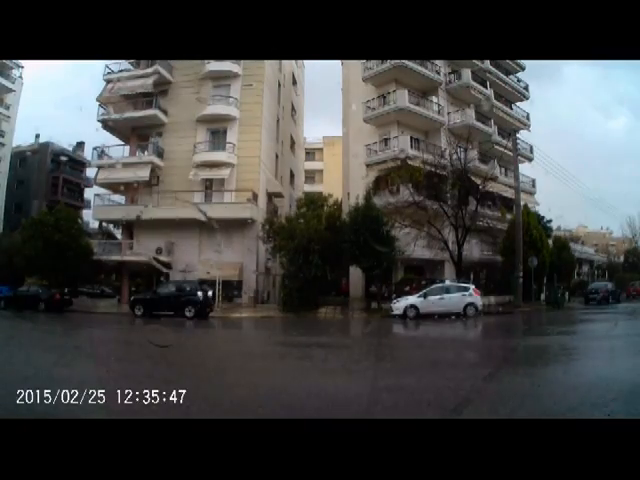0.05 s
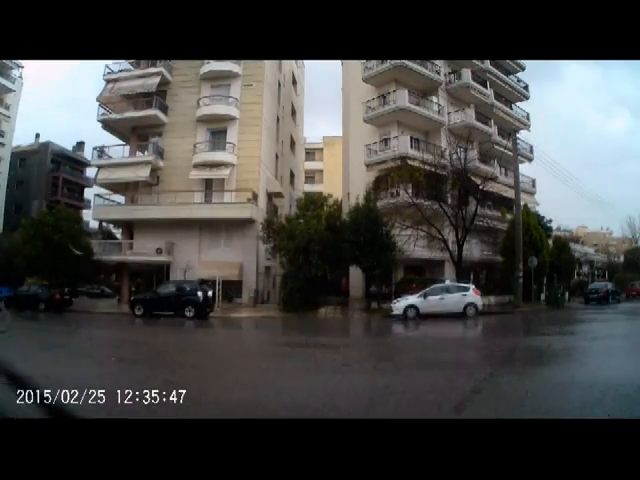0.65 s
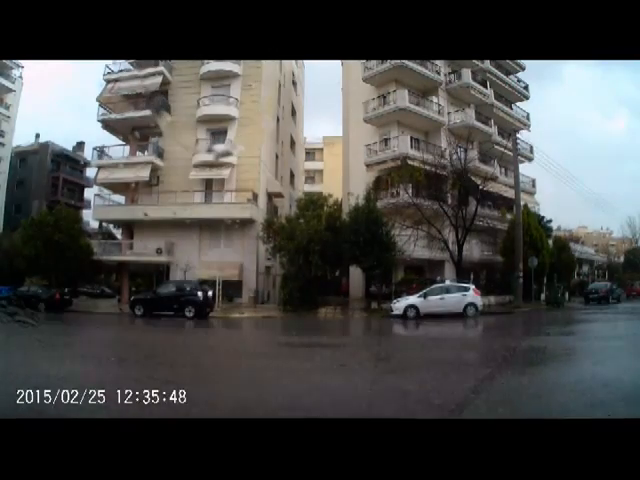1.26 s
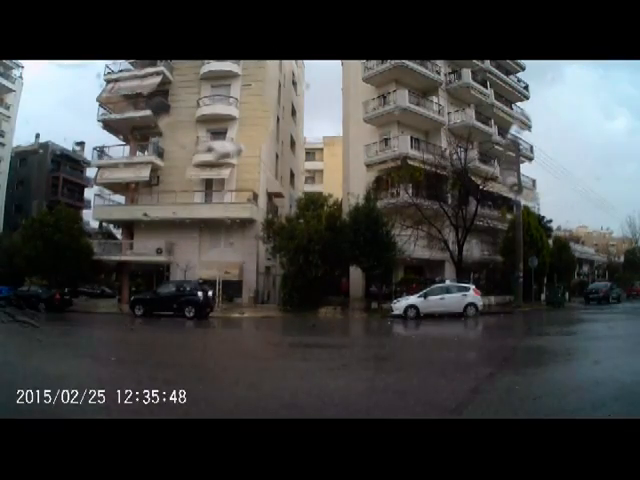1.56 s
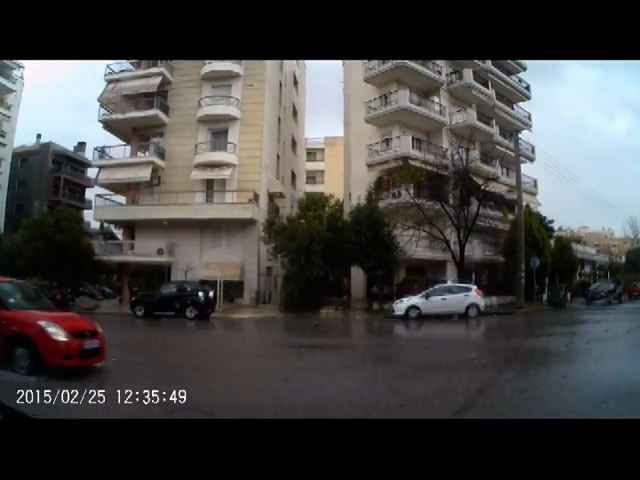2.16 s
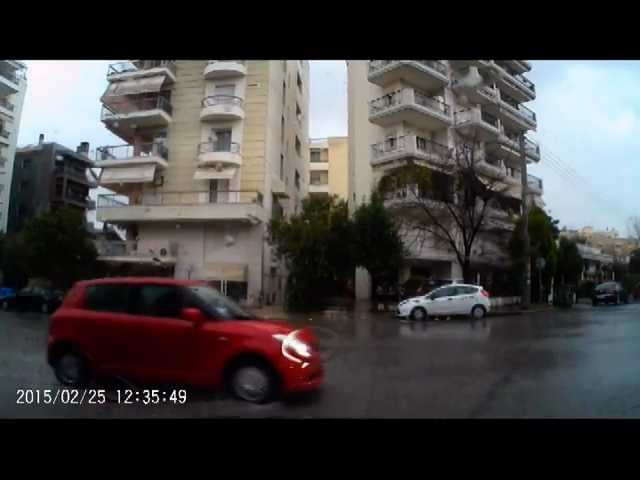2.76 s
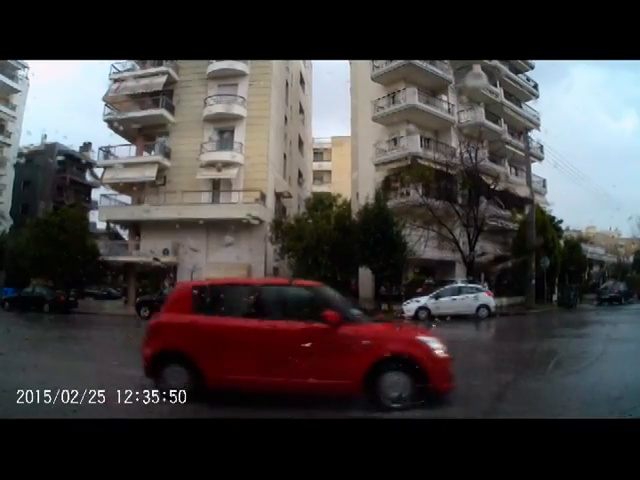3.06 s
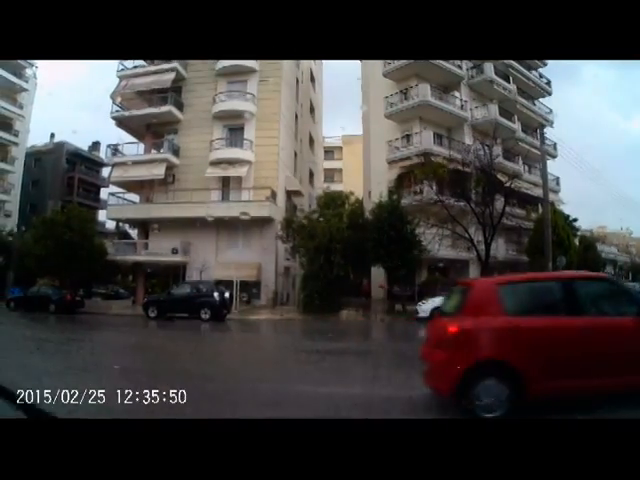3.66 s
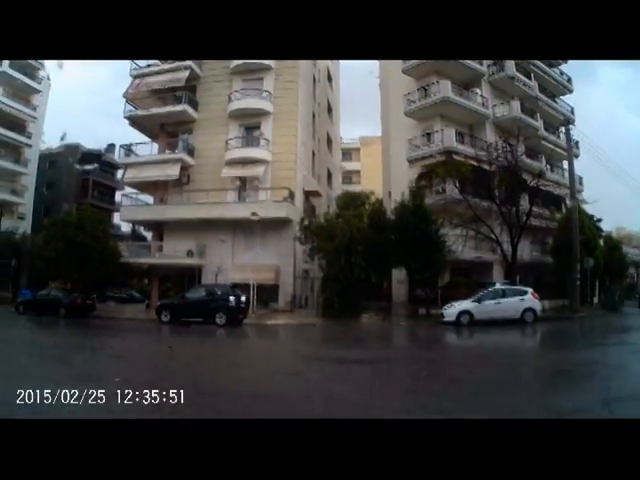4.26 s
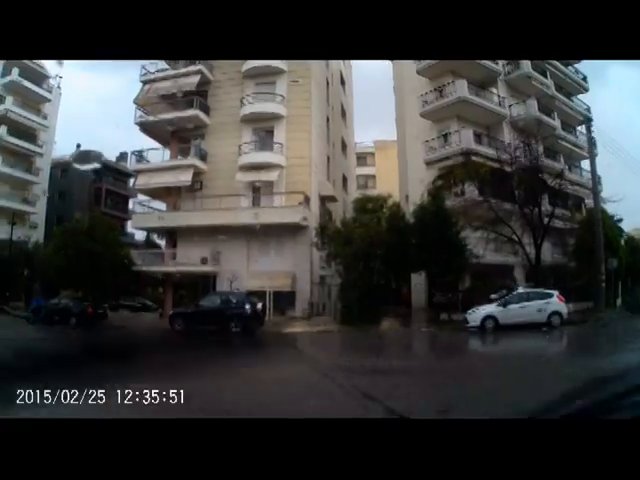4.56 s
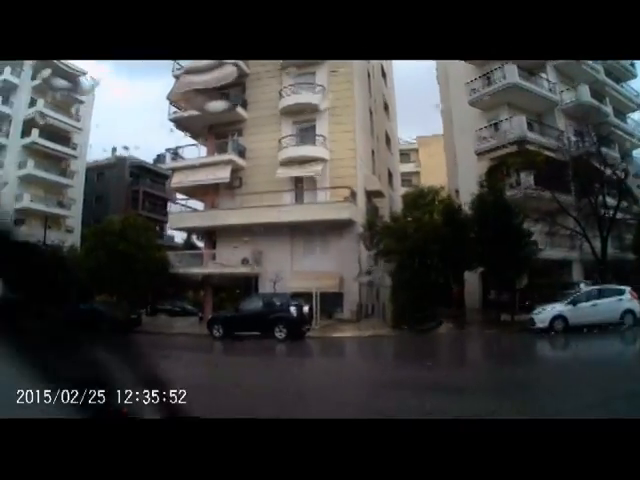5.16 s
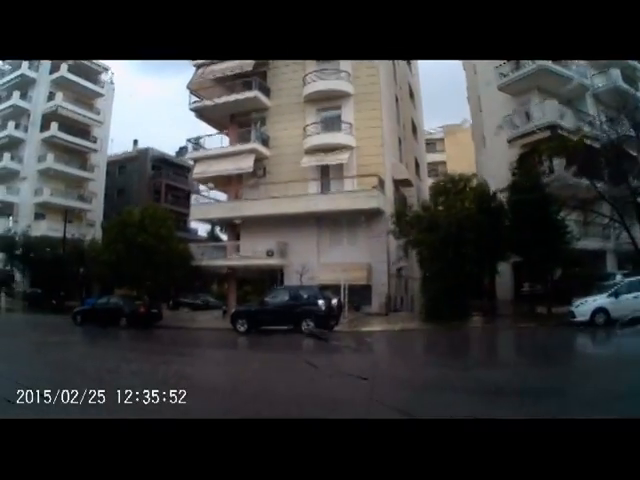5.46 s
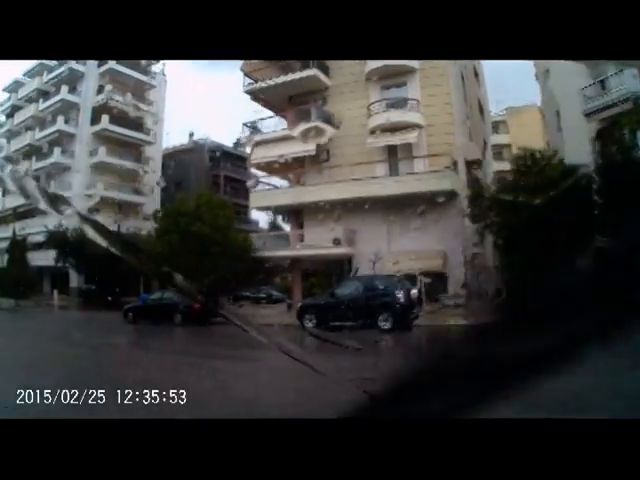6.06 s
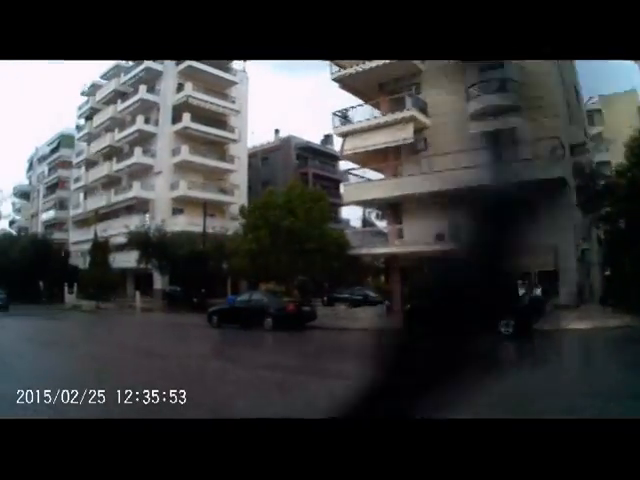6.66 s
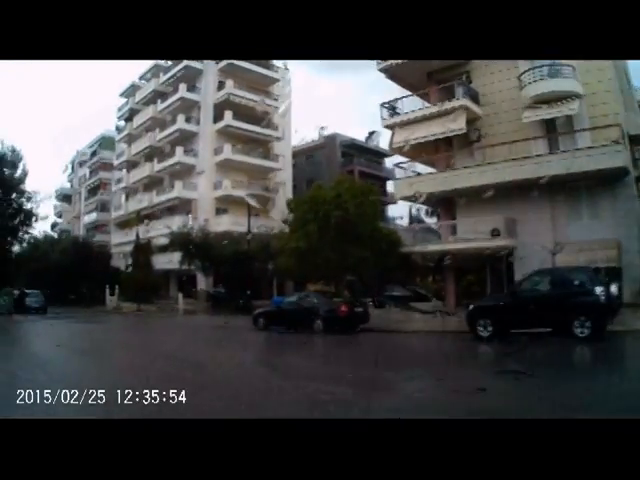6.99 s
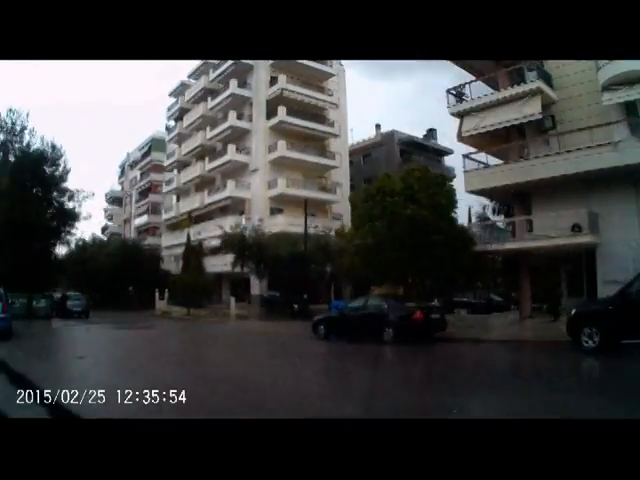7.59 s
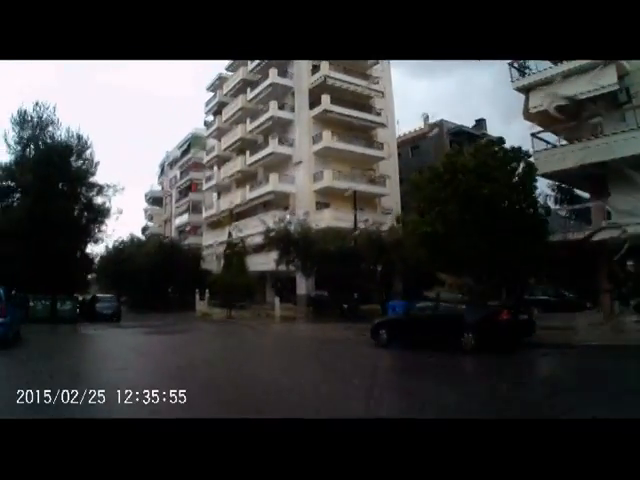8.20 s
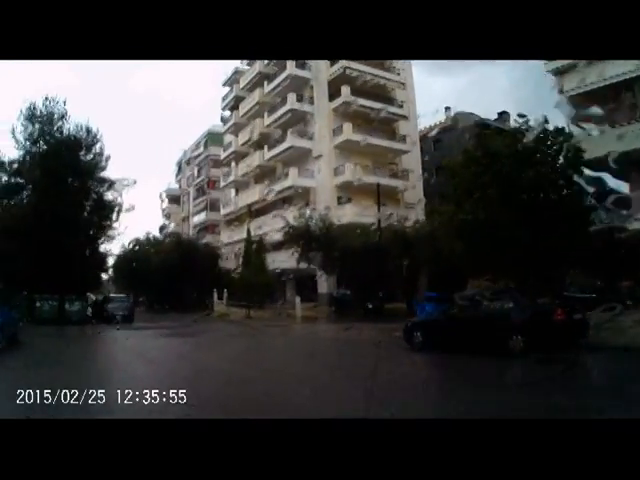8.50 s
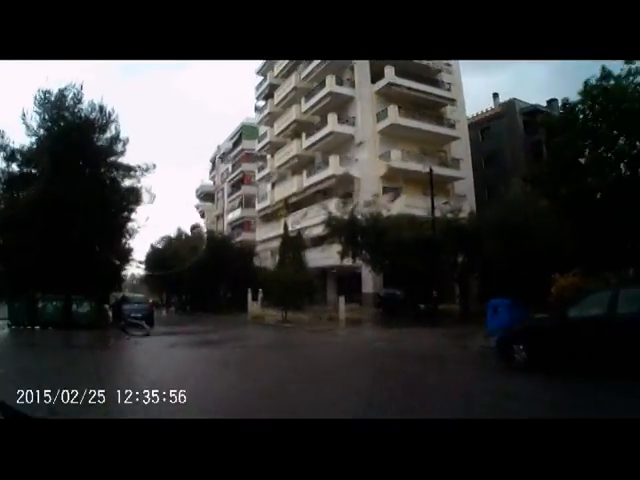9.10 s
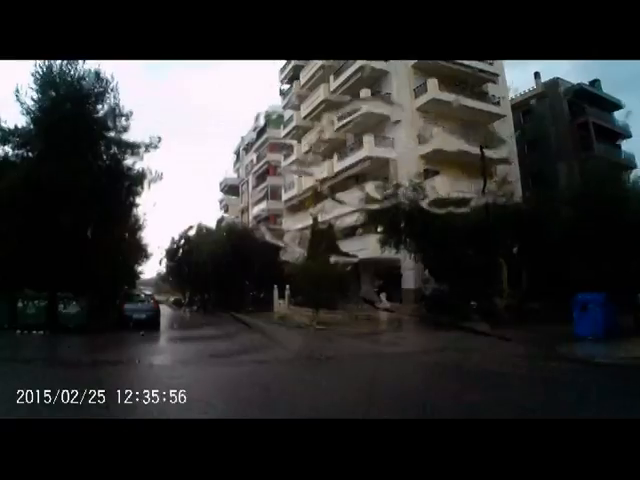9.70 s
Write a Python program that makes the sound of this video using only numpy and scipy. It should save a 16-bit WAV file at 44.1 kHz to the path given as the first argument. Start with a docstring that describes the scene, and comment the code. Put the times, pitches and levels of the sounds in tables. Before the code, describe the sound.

Inside a car, raindrops tap and patter over sweeping wipers and a low engine and tyre rumble that builds as it drives off.

```python
"""Inside a car at a rainy junction: it waits, lets another car cross, then pulls away down a wet street.
Drops tick on the windshield, patter on the roof and knock on the metal panels. The wipers rub over
the glass and thud softly at each end of their sweep. The engine idles and then works harder, the tyres
rumble and throw up water, and bumps shake the body. A camera's electronics whine faintly."""
import sys
import numpy as np
from scipy import signal
from scipy.fft import rfft, irfft, next_fast_len
from scipy.io import wavfile
from scipy.ndimage import uniform_filter1d

SR = 44100
rng = np.random.default_rng(int(sys.argv[2]) if len(sys.argv) > 2 else 0)


def output_pcm(signal):
    """Save a mono or channel-first signal as 16-bit PCM at the path in sys.argv[1].

    Samples are clipped to [-1, 1] before scaling.
    """
    pcm = np.clip(np.atleast_2d(signal).T, -1, 1) * 32767
    wavfile.write(sys.argv[1], SR, np.round(pcm).astype(np.int16))


N = 438354
TIME = np.arange(N) / SR

# the tone of a drop tapping on the glass: (frequency [Hz], level [dB])
TAP_TONE = [(300, -3.5), (900, -6.5), (2000, 2.5), (3500, 2.5), (4500, -7.5), (7000, -21), (9200, -31),
            (13000, -32), (15500, -42)]
# the tone of a drop bursting on the glass: (frequency [Hz], level [dB])
SPLASH_TONE = [(2500, -21.5), (4200, 7), (5500, 3.5), (7000, -2.5), (8200, -8), (9500, -21), (13000, -23.5),
               (15500, -20)]
# the tone of many small drops pattering: (frequency [Hz], level [dB])
PATTER_TONE = [(150, -6.5), (450, 3.5), (900, 7.5), (1500, 4.5), (2000, 8), (2800, 1.5), (3700, 3.5),
               (4400, -8.5), (5500, -8), (7000, -14), (8200, -19), (9200, -28.5), (13000, -25),
               (15500, -37)]


def rain():
    """Small drops tick and splash on the glass over a dense patter on the roof, all in light gusts."""
    # how strong the rain is: (time [s], level [dB])
    strength = [(0, -40), (.7, -39.5), (1.5, -41.5), (2.7, -39.5), (3.3, -39.5), (4.4, -35), (6.1, -37.5),
                (6.8, -35.5), (7.7, -34.5), (8.25, -31.5), (9.2, -30.5), (9.94, -31.5)]
    level_db, = over_time(strength)
    glass = shower(TAP_TONE, per_s=200, spread_db=3.5, flurry_db=2.5, tail_db=-5, fade_s=0.02)
    roof = shower(PATTER_TONE, per_s=1600, spread_db=7.5, flurry_db=4.5, tail_db=4.5, fade_s=0.02)
    splashes = shower(SPLASH_TONE, per_s=110, spread_db=4.5, flurry_db=3, tail_db=-3, fade_s=0.012)
    splash_db = -14.5 + 0.16 * (level_db - level_db.mean())   # heavier rain splashes more
    ticks = from_db(-6.5) * glass + from_db(splash_db) * splashes
    gusts = from_db(0.8 * drift(9))
    return from_db(level_db) * gusts * (ticks + from_db(-3.5) * roof)


def shower(tone, per_s, spread_db, flurry_db, tail_db, fade_s, spots=14):
    """Drops of uneven size fall in flurries on many spots, and each spot rings in its own way."""
    sizes = from_db(spread_db * np.minimum(rng.exponential(1, N), 2.4))
    flurry = from_db(flurry_db * np.clip(drift(22), -2, 2))
    lands = rng.random(N) < per_s * flurry / SR
    hits = sizes * lands * rng.choice([-1, 1], N)
    spot = rng.integers(0, spots, N)
    taps = np.zeros(N)
    for k in range(spots):
        taps += signal.oaconvolve(hits * (spot == k), one_drop(tail_db, fade_s, ring_db=-8))[:N]
    return normalise(colour(taps, tone))


def one_drop(tail_db, fade_s, ring_db, size=1500):
    """A drop makes a sharp tap, a brief ring where it lands and a tail of echoes in the cabin."""
    t = np.arange(size) / SR
    echoes = normalise(rng.standard_normal(size) * from_db(-60 * t / fade_s))
    hit = from_db(tail_db) * echoes / np.sqrt(size)
    hit[0] += 1   # the tap itself
    spot_hz = 2400 * np.exp(0.44 * np.clip(rng.standard_normal(), -2, 2))
    return hit + from_db(ring_db) * resonate(hit, spot_hz, width_hz=1160)


def heavy_drops(thock_db, ping_db, splash_db, size=1500):
    """Fat drops strike the windshield, each with a dull thock, a glassy ping and a bright splash."""
    # each drop, before the three gains above are added: (time [s], thock [dB], ping [dB], splash [dB])
    drops = [(0.1078, -36, -43, -47), (0.8066, -44, -33, -44), (0.8429, -36, -32, -49),
             (1.0086, -31, -30.5, -53), (1.08, -34, -38, -41), (1.1541, -38, -42, -48),
             (1.3754, -36, -33, -48), (1.6594, -44, -34, -53), (2.071, -34, -29, -45),
             (2.4576, -33, -32, -57), (2.5737, -35, -31, -47), (3.0196, -45, -32, -53),
             (3.1235, -43, -32, -44), (3.1968, -35, -32, -40), (3.3087, -39, -31, -49),
             (3.3752, -37, -31, -52), (3.4505, -29, -30, -46), (3.7236, -36, -28, -47),
             (3.9055, -30, -30, -48), (4.0585, -45, -28, -45), (4.1363, -38, -25.5, -38),
             (4.4013, -39, -31, -50), (4.4087, -41, -32, -50), (4.5372, -42, -34, -45),
             (4.583, -30, -25.5, -38), (4.66, -34, -26, -35), (4.6657, -29, -20.5, -30),
             (4.78, -35, -28, -48), (5.008, -42, -26.5, -44), (5.098, -31, -29, -37),
             (5.2226, -28.5, -25, -37), (5.266, -35, -25, -36), (5.3774, -37, -27, -34),
             (5.3973, -40, -30, -39), (5.637, -40, -27, -50), (5.713, -45, -32, -49),
             (5.8117, -31, -29, -51), (6.0953, -28.5, -27, -38), (6.2046, -40, -28, -46),
             (6.3191, -43, -28, -40), (6.475, -47, -27, -47), (6.542, -37, -36, -44),
             (6.5543, -38, -31, -37), (6.6308, -44, -27.5, -54), (6.7817, -30, -26, -46),
             (6.8282, -47, -27, -50), (6.9165, -50, -52, -48), (7.0014, -39, -25, -39),
             (7.1343, -38, -28, -51), (7.216, -38, -36, -40), (7.2573, -44, -28, -37),
             (7.305, -34, -26, -44), (7.3295, -44, -27, -47), (7.5224, -33, -22.5, -45),
             (7.6153, -28, -22.5, -38), (7.6705, -38, -29, -45), (7.858, -32, -30, -44),
             (7.901, -39, -28, -37), (8.142, -43, -27, -44), (8.1475, -37, -26, -38),
             (8.1597, -36, -23.5, -37), (8.239, -32, -28, -47), (8.3525, -38, -24, -42),
             (8.5243, -30, -27, -46), (8.5698, -27, -21, -28), (8.6014, -31, -22, -41),
             (8.6936, -39, -24, -39), (8.9197, -44, -20, -35), (9.0023, -31, -23, -30),
             (9.0687, -40, -20, -33), (9.0828, -27, -26, -40), (9.2767, -44, -22, -38),
             (9.287, -41, -29, -36), (9.5698, -33, -35, -27.5), (9.6433, -42, -21.5, -47),
             (9.778, -29, -31, -37), (9.8738, -33, -27, -37)]
    # the tone of the thock: (frequency [Hz], level [dB])
    thock_tone = [(250, -5), (600, -5.5), (1100, 4.5), (1700, 3.5), (2600, -24), (5000, -25)]
    out = np.zeros(N + size)
    for s, *levels_db in drops:
        start = int(s * SR)
        hit = one_drop(tail_db=-2, fade_s=0.02, ring_db=-10, size=size)
        ping_hz = 3380 * np.exp(0.05 * rng.standard_normal())   # each spot has a slightly different note
        ping = resonate(colour(hit, TAP_TONE), ping_hz, width_hz=1400)
        parts = colour(hit, thock_tone), ping, colour(hit, SPLASH_TONE)
        for part, db, gain_db in zip(parts, levels_db, (thock_db, ping_db, splash_db)):
            out[start:start + size] += from_db(db + gain_db) * part / np.linalg.norm(part)
    return out[:N]


def knocks(fade_s, width_hz, small_per_s, small_db, low_hz, high_hz, size=5000):
    """Blobs of water hit the roof and bonnet, which answer with a hollow note under a brief spatter."""
    # the big blobs: (time [s], relative level [dB], panel note [Hz])
    big_blobs = [(3.18, -22.5, 980), (3.72, -21, 860), (4.25, -20, 950), (5.485, -24, 560),
                 (5.811, -25, 830), (7.719, -23, 930), (8.939, -18, 830), (9.567, -22, 600)]
    chances = rng.random((int(small_per_s * N / SR), 2))
    small_blobs = [(when * (N - size) / SR, small_db, low_hz * (high_hz / low_hz) ** where)
                   for when, where in chances]
    notes, spatter = np.zeros(N), np.zeros(N)
    t = np.arange(size) / SR
    for s, db, hz in big_blobs + small_blobs:
        start = int(s * SR)
        push = rng.standard_normal(size) * from_db(-60 * t / fade_s)
        note = resonate(resonate(push, hz, width_hz), hz, 2 * hz)
        notes[start:start + size] += from_db(db) * note / np.abs(note).max()
        droplets = rng.random(size) < 2500 / SR
        spatter[start:start + size] += from_db(db) * push * droplets
    return from_db(-1) * notes + from_db(2) * colour(spatter, PATTER_TONE)


def wiper_thuds(drag_s, flop_s, drag_share, glass_hz, glass_width_hz):
    """At each end of a sweep the blades drag, then flop over with a thud that booms in the glass."""
    # each turn of the blades: (time [s], level [dB], relative boom [dB])
    turns = [(.11, -36, -6), (.85, -32.5, -2.5), (1.51, -35.5, -9), (2.258, -30, -18), (2.88, -35.5, -3.5),
             (3.665, -29.5, -12), (4.29, -30.5, -8), (5.045, -30.5, -3), (5.67, -33.5, -1), (6.43, -33, -3),
             (7.07, -36, -8), (7.815, -29.5, -14), (8.45, -32, -7), (9.2, -29.5, -8), (9.85, -34, -16)]
    # the tone of the thud: (frequency [Hz], level [dB])
    thud_tone = [(50, -2), (105, 5), (160, -1), (220, 2.5), (330, -8), (550, -11), (900, -10.5),
                 (2000, -30.5)]
    thud = noise(thud_tone)
    boom = from_db(3) * normalise(resonate(thud, glass_hz, glass_width_hz))
    out = np.zeros(N)
    for s, db, boom_db in turns:
        drag = np.exp(-np.abs(TIME - s) / drag_s)
        flop = np.exp(-np.abs(TIME - s) / flop_s)
        swell = drag_share * drag + (1 - drag_share) * flop
        out += from_db(db) * (swell * thud + from_db(boom_db) * drag * boom)
    return out


def wiper_rubs(width_hz, splatter_db, fall_octaves_per_s):
    """Wet rubber slides on the glass and flicks water ahead; its breathy note falls as it slows."""
    # each rub: (time [s], half length [s], level [dB], note [Hz])
    rubs = [(0.607, 0.039, -39, 680), (0.976, 0.019, -39.5, 1000), (1.156, 0.057, -42, 900),
            (1.548, .018, -39, 618), (1.714, .018, -39, 605), (2.12, 0.046, -43.5, 706),
            (3.105, .06, -47, 737)]
    grain = drift(width_hz)
    droplets = rng.standard_normal(N) * (rng.random(N) < 1200 / SR)
    splatter = from_db(splatter_db) * normalise(colour(droplets, PATTER_TONE))
    out = np.zeros(N)
    for s, half_s, db, hz in rubs:
        near = np.abs(TIME - s) < 2 * half_s
        t = TIME[near] - s
        phase = 2 * np.pi * np.cumsum(hz * 2 ** (-fall_octaves_per_s * t)) / SR
        note = np.sqrt(2) * grain[near] * np.sin(phase)
        out[near] += from_db(db) * np.exp(-(t / half_s) ** 2) * (note + splatter[near])
    return out


def engine(roughness):
    """The engine's firing makes a low note with overtones that booms unevenly through the body."""
    # it idles, revs briefly, pulls, sags and pulls again: (time [s], firing rate [Hz], level [dB])
    revs = [(0, 28.3, -24), (1.7, 28.7, -22.5), (1.92, 34, -29), (2.25, 42, -23), (2.5, 32, -30),
            (2.76, 42, -24), (3.0, 50, -44), (3.5, 55, -35), (4.0, 41, -23.5), (4.4, 35, -22),
            (5.1, 42, -20.5), (5.65, 42, -21), (6.2, 43, -28), (6.6, 35, -19), (6.9, 25, -21.5),
            (7.65, 28, -16.5), (8.1, 34, -21), (8.95, 45, -19.5), (9.94, 41, -35)]
    # the overtones: (multiple of the firing rate, level against the low note [dB])
    overtones = [(2, -26.5), (3, -23.5), (4, -28.5), (5, -35), (7, -52)]
    firing_hz, level_db = over_time(revs)
    phase = 2 * np.pi * np.cumsum(firing_hz) / SR
    hum = np.zeros(N)
    for multiple, db in [(0.99, 0)] + overtones:   # the low note comes first
        wave = np.sin(multiple * phase + rng.uniform(0, 2 * np.pi))
        flutter = 1 + roughness * multiple * drift(8.6)
        hum += from_db(db) * wave * flutter
    return np.sqrt(2) * from_db(level_db) * hum


def road(drum_hz, drum_width_hz):
    """The body sways on its springs, the tyres rumble and roar, and the air inside them drums."""
    # the tones of the sway, the rumble and the roar: (frequency [Hz], level [dB])
    sway_tone = [(12, -26), (22, -2.5), (27, 14.5), (40, 3.5), (54, 5), (75, -19), (120, -34)]
    rumble_tone = [(45, -12), (66, 4.5), (81, 7), (105, 2.5), (135, -8), (200, -18), (400, -30)]
    roar_tone = [(90, -2), (150, 0), (215, -1.5), (320, -1.5), (520, -6.5), (850, -3.5), (1300, -6),
                 (2500, -10.5), (5000, -45.5)]
    tyre_air = resonate(rng.standard_normal(N), drum_hz, drum_width_hz)
    tyre_air = normalise(resonate(tyre_air, drum_hz, 2 * drum_width_hz))
    drum = rolling(rest_db=-69, moving_db=-40, power=3.7) * tyre_air
    rumble = rolling(rest_db=-56.5, moving_db=-30) * from_db(2.35 * drift(3.9)) * noise(rumble_tone)
    other_car = passing_car(nearest_s=3.8, half_s=0.85, db=-39)
    roar = np.hypot(rolling(rest_db=-39.5, moving_db=-49.5), other_car) * noise(roar_tone)
    sway = rolling(rest_db=-48, moving_db=-21.5, power=1.15) * noise(sway_tone)
    return sway + rumble + drum + roar


def bumps(shake_hz, boom_hz):
    """Each bump in the road shakes the body and makes the cabin boom: two low, wavering notes."""
    # each bump: (time [s], half length [s], shake [dB], boom [dB])
    jolts = [(4.558, .07, -33, -35), (4.797, 0.17, -17.5, -28.5), (5.22, 0.061, -14, -24.5),
             (5.618, 0.16, -18, -27), (6.674, 0.022, -35, -36), (7.626, 0.19, -14, -36),
             (7.977, 0.086, -33, -27), (9.412, 0.23, -23, -27), (9.925, 0.11, -14, -20.5)]
    shake = np.sqrt(2) * np.sin(2 * np.pi * shake_hz * TIME + drift(7.5))
    boom = np.sqrt(2) * np.sin(2 * np.pi * boom_hz * TIME + drift(7.5))
    out = np.zeros(N)
    for s, half_s, shake_db, boom_db in jolts:
        swell = np.exp(-((TIME - s) / half_s) ** 2)
        out += swell * (from_db(shake_db) * shake + from_db(boom_db) * boom)
    return out


def spray():
    """Tyres throw up water: this car's as it gathers speed, and those of the car crossing ahead."""
    # the tone of the flying water: (frequency [Hz], level [dB])
    spray_tone = [(200, 2), (330, -11.5), (500, -6.5), (800, 2.5), (1500, -13), (2300, -1), (3600, 2),
                  (4500, -7.5), (6500, -10), (8200, -22), (9300, -22), (13000, -34), (15500, -50)]
    this_car = rolling(rest_db=-52.5, moving_db=-38, power=7.8)
    other_car = passing_car(nearest_s=4.2, half_s=0.78, db=-44.5)
    flicker = from_db(1.5 * drift(43))
    return np.hypot(this_car, other_car) * flicker * noise(spray_tone)


def rolling(rest_db, moving_db, power=1):
    """The volume of a road noise: a steady part plus a part that grows with the car's speed."""
    # the car waits, creeps forward and speeds up: (time [s], share of top speed [0 to 1])
    journey = [(0, 0.069), (2.0, 0.16), (2.8, 0.18), (3.2, 0.42), (3.9, 0.25), (4.7, 0.79), (5.7, 0.67),
               (6.3, 0.79), (7.3, 0.77), (8.3, 0.94), (9.3, 0.97), (9.94, 0.92)]
    speed, = over_time(journey)
    return from_db(rest_db) + from_db(moving_db) * speed ** power


def passing_car(nearest_s, half_s, db):
    """The volume of a car going by in a straight line: twice as far away is half as strong."""
    return from_db(db) / np.hypot(1, (TIME - nearest_s) / half_s)


def cabin(sound):
    """The cabin air, the glass and the camera's case ring, lifting some pitches; one pitch is dipped."""
    # each band of pitches: (frequency [Hz], width [Hz], lift [dB])
    bands = [(85.4, 8, 1), (103, 7.1, -5), (214, 12, 4), (502, 66, 7.5), (580, 8.2, 9), (989, 33, 4),
             (2300, 290, 1.5), (3200, 384, 5.5), (3930, 490, 1), (13100, 460, 5.5)]
    return sound + sum((from_db(db) - 1) * resonate(sound, hz, width) for hz, width, db in bands)


def electronics(pulse_hz, pulse_db, hiss_db):
    """The camera gives off a thin steady tone, a higher one twice a second and a faint hiss."""
    # the steady tone: (frequency [Hz], level [dB])
    tones = [(8660, -71)]
    steady = sum(from_db(db) * np.sin(2 * np.pi * hz * TIME) for hz, db in tones)
    switched_on = 1.0 * ((TIME - 0.23) % 0.5 < 0.1)
    soft_pulses = uniform_filter1d(switched_on, size=1200) * from_db(1.5 * drift(4))
    pulsing = from_db(pulse_db) * soft_pulses * np.sin(2 * np.pi * pulse_hz * TIME)
    return np.sqrt(2) * (steady + pulsing) + from_db(hiss_db) * rng.standard_normal(N)


def from_db(db):
    """Turn decibels into a number to multiply by."""
    return 10 ** (np.asarray(db) / 20)


def normalise(x):
    """Scale a signal so that its average strength (rms) is 1."""
    return x / np.sqrt(np.mean(x ** 2) + 1e-20)


def over_time(rows):
    """Join a table's points with straight lines, giving one curve for each column after the time."""
    times, *columns = np.transpose(rows)
    return [np.interp(TIME, times, column) for column in columns]


def drift(rate_hz):
    """A random wobble of strength 1, mostly slower than the given rate."""
    hz = np.arange(N // 2 + 1) * SR / N
    return normalise(irfft(rfft(rng.standard_normal(N)) / (1 + (hz / rate_hz) ** 2), N))


def colour(x, tone):
    """Filter a sound to follow a tone table, fading away above the table's last frequency."""
    size = 2 * next_fast_len(len(x) // 2 + SR // 10)
    hz, db = np.transpose(tone)
    grid_hz = np.maximum(np.arange(size // 2 + 1) * SR / size, 1)
    gain = from_db(np.interp(np.log(grid_hz), np.log(hz), db)) / (1 + (grid_hz / hz[-1]) ** 4)
    # make the filter ring only after a hit, never before it (minimum phase)
    cepstrum = irfft(np.log(gain))
    cepstrum[1:size // 2] *= 2
    cepstrum[size // 2 + 1:] = 0
    return irfft(rfft(x, size) * np.exp(rfft(cepstrum)))[:len(x)]


def noise(tone):
    """Steady noise of strength 1 with the given tone."""
    return normalise(colour(rng.standard_normal(N), tone))


def resonate(x, hz, width_hz):
    """Let a sound ring around one pitch; a narrower width rings longer."""
    decay = np.exp(-np.pi * width_hz / SR)
    feedback = [1, -2 * decay * np.cos(2 * np.pi * hz / SR), decay ** 2]
    return signal.lfilter(np.array([1, 0, -1]) * (1 - decay ** 2) / 2, feedback, x)


def scene():
    """Everything together in one channel, heard from behind the windshield."""
    car = road(drum_hz=204, drum_width_hz=110) + bumps(shake_hz=26.2, boom_hz=80.5)
    car += spray() + engine(roughness=0.03)
    drops = rain() + heavy_drops(thock_db=22, ping_db=18, splash_db=21.5)
    wipers = wiper_thuds(drag_s=0.08, flop_s=0.025, drag_share=0.55, glass_hz=100, glass_width_hz=20)
    wipers += wiper_rubs(width_hz=330, splatter_db=2, fall_octaves_per_s=9)
    whine = electronics(pulse_hz=14840, pulse_db=-77, hiss_db=-74.5)
    blobs = knocks(fade_s=0.09, width_hz=670, small_per_s=2.3, small_db=-32, low_hz=470, high_hz=1050)
    return (cabin(drops + blobs + wipers + car) + whine)[None]


def record(dry):
    """Fade in quickly to avoid a click, then cut away the highest treble."""
    fade_in = np.minimum(TIME / 0.004, 1)
    treble_cut = signal.ellip(10, 0.1, 80, 15800, fs=SR, output="sos")
    return signal.sosfilt(treble_cut, dry * fade_in)


dry = scene()
out = record(dry)
output_pcm(out)
```